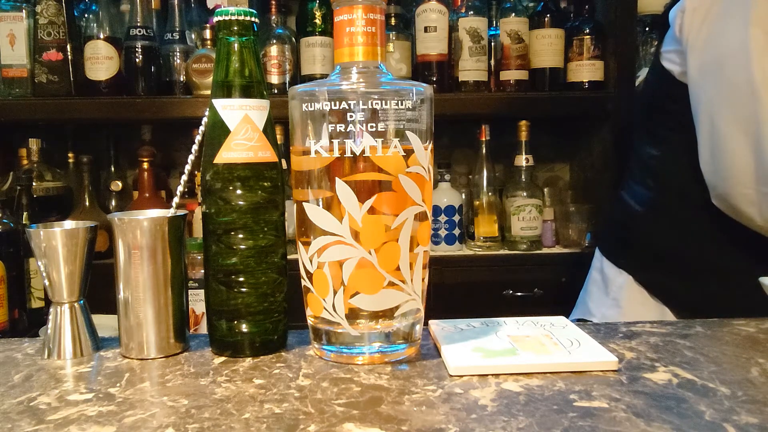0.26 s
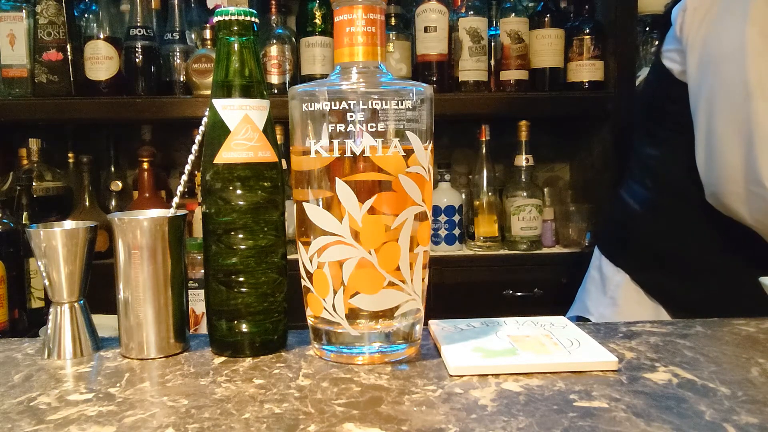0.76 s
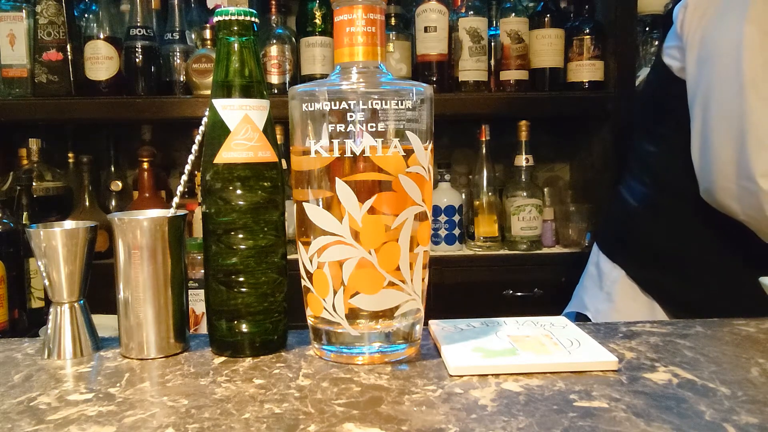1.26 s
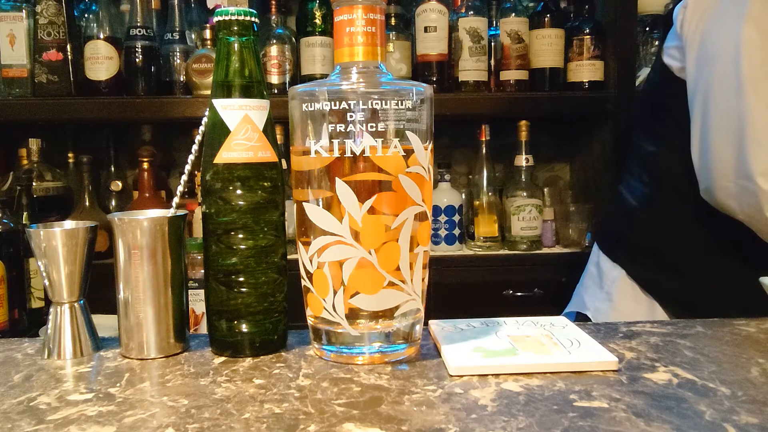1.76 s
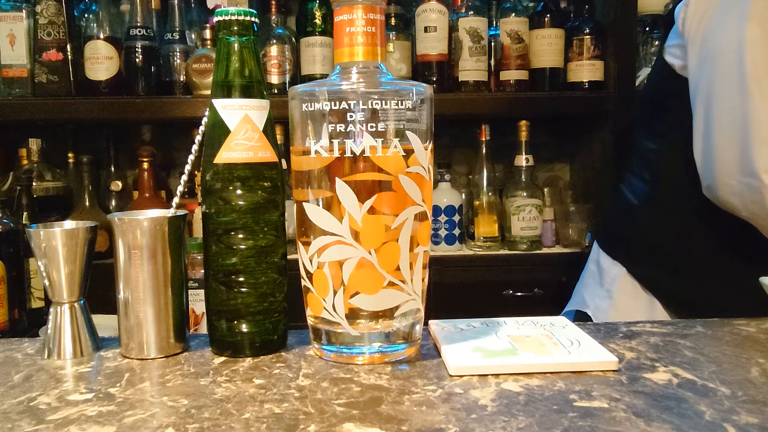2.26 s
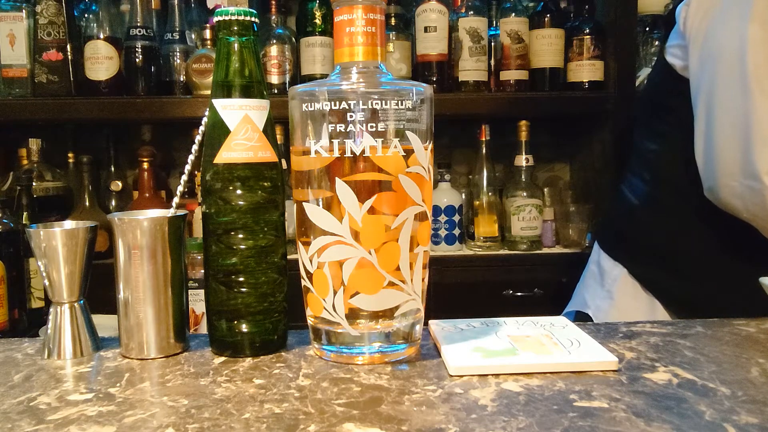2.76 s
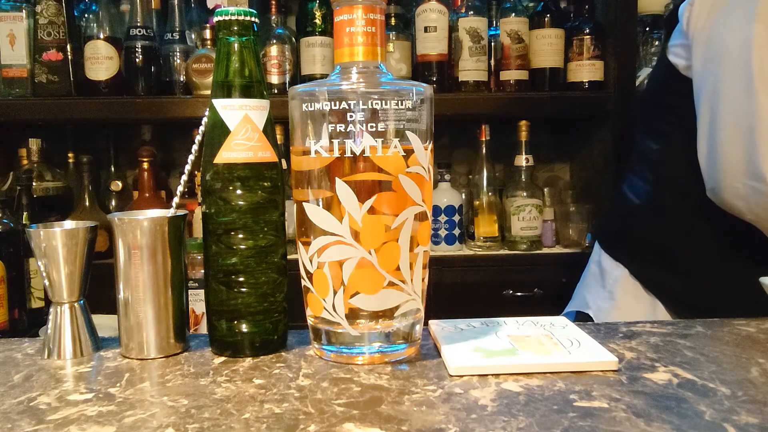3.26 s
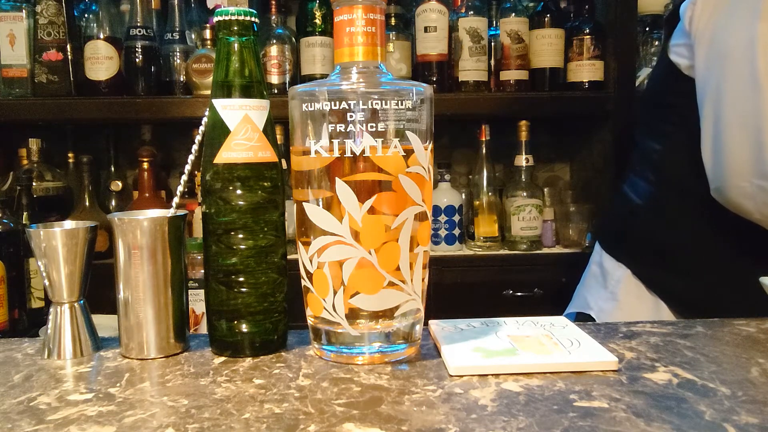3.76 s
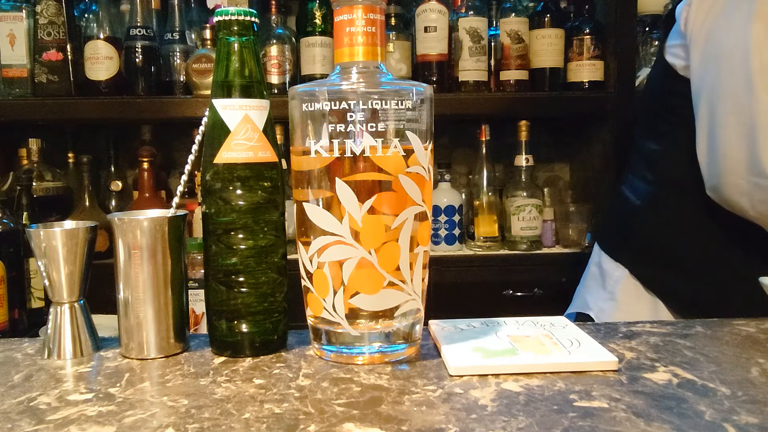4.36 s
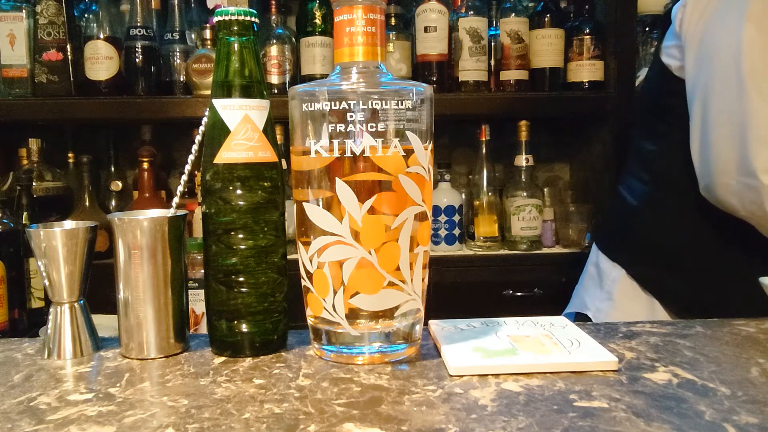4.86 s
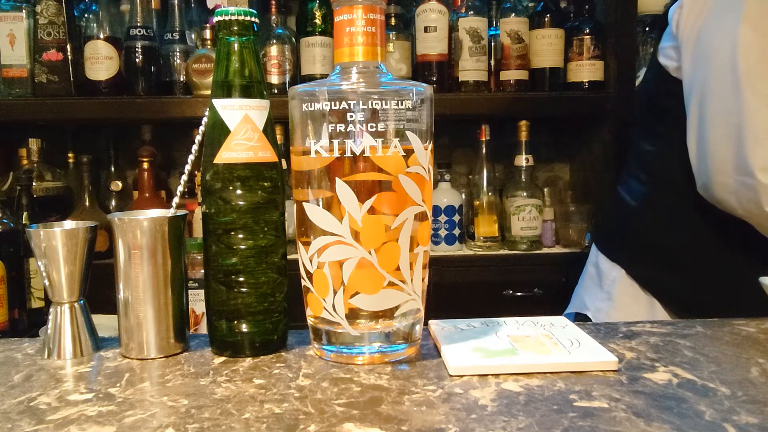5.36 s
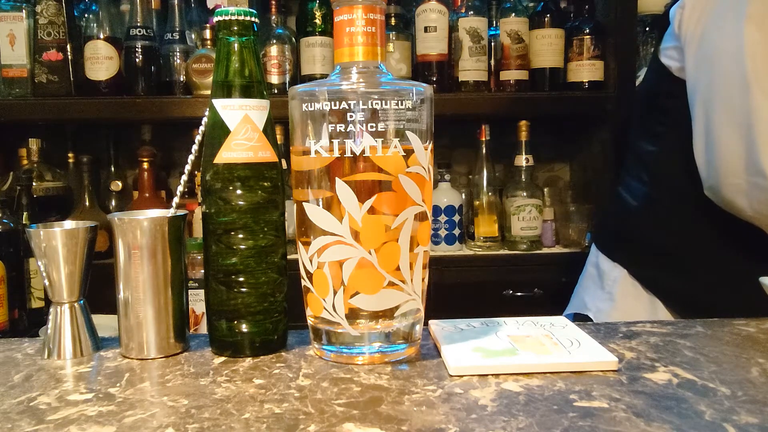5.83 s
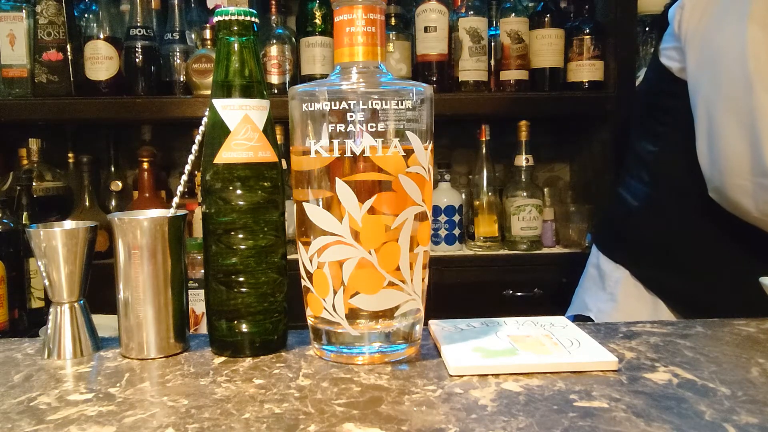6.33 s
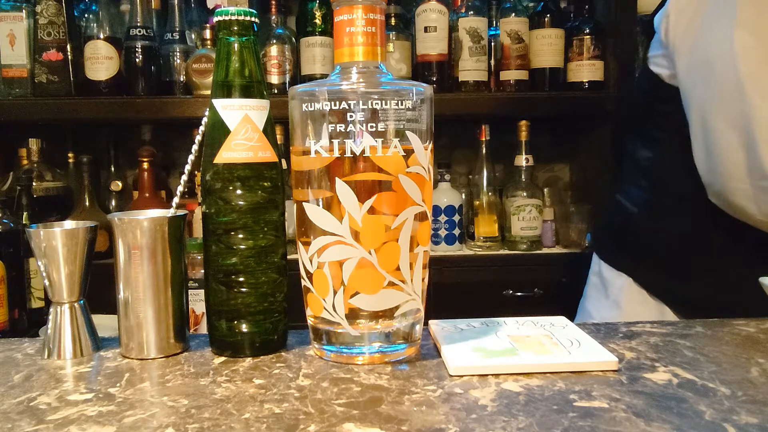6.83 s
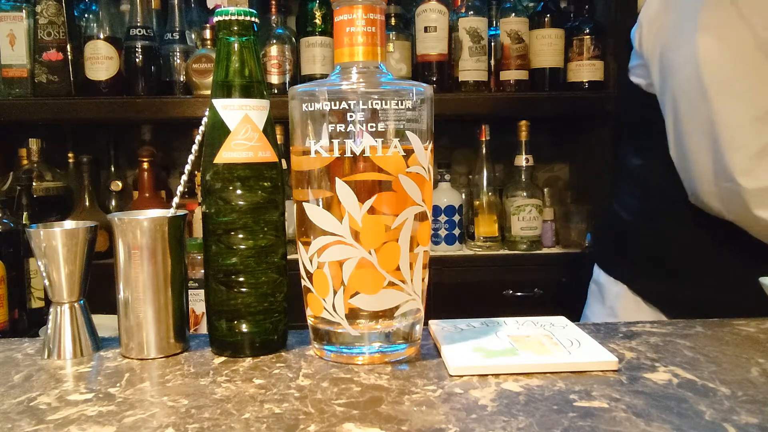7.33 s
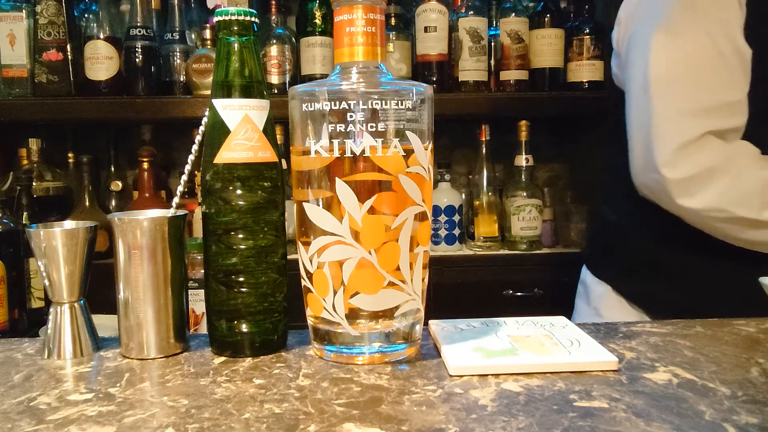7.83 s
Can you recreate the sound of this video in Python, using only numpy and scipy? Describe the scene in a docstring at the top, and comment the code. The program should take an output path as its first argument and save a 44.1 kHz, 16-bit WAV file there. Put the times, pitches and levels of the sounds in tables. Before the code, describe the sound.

Thin metal clinks open the scene, then ice cubes clatter and shift as a scoop pushes through them several times, loudest a little past the middle. The ice settles, the scoop clinks down, and a wooden surface takes some soft knocks. Everything is heard slightly indirectly from across a bar counter, with short small-room echoes and the low, steady hum of a fridge.

```python
"""Behind a quiet bar counter a steel scoop is picked up, digs through a bin of ice and is laid down.
Cubes knock, slide and tumble, ringing the bin; the scoop clinks; the wooden top takes a few dull knocks.
Each blow is a contact plus a dying rattle that drives decaying modes and an unpitched tick.
A small room blurs every blow; a fridge hums throughout."""
import sys
import numpy as np
from scipy import signal
from scipy.fft import rfft, irfft, next_fast_len
from scipy.io import wavfile

SR = 44100
rng = np.random.default_rng(int(sys.argv[2]) if len(sys.argv) > 2 else 0)


def inscribe(sig):
    """Save sig as 16-bit PCM at rate SR to the path in sys.argv[1].

    A 1-D sig is mono; a 2-D sig holds one channel per row.
    Samples are clipped to [-1, 1] before scaling.
    """
    pcm = np.round(np.clip(np.atleast_2d(sig).T, -1, 1) * 32767)
    wavfile.write(sys.argv[1], SR, pcm.astype(np.int16))


N = 356764
RING_SAMPLES, PLACES = 2 ** 14, 4  # places: spots where blows land


def amp(db):
    return 10 ** (np.asarray(db) / 20)


def unit_energy(x):
    return x / np.sqrt(np.sum(x ** 2))


def curve_at(table, hz):
    """Read an (Hz, value) table on a log-frequency axis."""
    table_hz, values = np.transpose(table)
    return np.interp(np.log(np.maximum(hz, 1)), np.log(table_hz), values)


def convolve(x, response):
    return signal.oaconvolve(np.atleast_2d(x), np.atleast_2d(response), axes=1)[:, :N]


def min_phase(table, size=4096):
    """Minimum-phase response of an (Hz, dB) table."""
    cepstrum = irfft(np.log(amp(curve_at(table, np.fft.rfftfreq(size, 1 / SR)))))
    cepstrum[1:size // 2] *= 2
    cepstrum[size // 2 + 1:] = 0
    return irfft(np.exp(rfft(cepstrum)))[:size // 2]


def tick(spectrum):
    """A short unpitched contact of the given colour."""
    return np.pad(unit_energy(min_phase(spectrum)), (0, RING_SAMPLES - 2048))


def ring(modes, scatter_db):
    """Decaying modes; where the blow lands changes their balance."""
    t = np.arange(RING_SAMPLES) / SR
    offsets_db = scatter_db * rng.standard_normal(len(modes))
    out = 0
    for (hz, db, t60_s), offset_db in zip(modes, offsets_db):
        decay = 1000. ** (-t / max(t60_s, .005))
        out += amp(db + offset_db) * np.sin(2 * np.pi * hz * t) * decay
    return unit_energy(out)


def grains(shape, rate_hz, scatter_db):
    """Sparse tiny collisions of either sign with long-tailed sizes."""
    hit = rng.random(shape) < rate_hz / SR
    return hit * rng.choice([-1., 1.], shape) * amp(scatter_db * rng.exponential(size=shape))


def blows(events, rate_hz, scatter_db, contact, size=4096):
    """Force (place, band, sample): a first contact and a dying rattle, at each place in turn."""
    rattle = grains((len(events), size), rate_hz, scatter_db)
    rattle[:, 0] = contact
    t = np.arange(size) / SR
    force = np.zeros((PLACES, 3, N + size))
    for k, (start_s, db, low_db, high_db, decay_s) in enumerate(events):
        burst = unit_energy(rattle[k] * np.exp(-t / decay_s))
        start = int(start_s * SR)
        force[k % PLACES, :, start:start + size] += amp(db + np.array([[0], [low_db], [high_db]])) * burst
    return force[:, :, :N]


def struck(force, modes, contact_tick, scatter_db, edges_hz):
    """One sound per place: mid, low and high bands of a body, each driven by its own force."""
    cuts = (edges_hz, "band"), (edges_hz[0], "low"), (edges_hz[1], "high")
    filters = [signal.butter(3, hz, kind, fs=SR, output="sos") for hz, kind in cuts]
    sounds = []
    for band_forces in force:
        body = ring(modes, scatter_db) + contact_tick
        bands = [unit_energy(signal.sosfilt(sos, body)) for sos in filters]
        sounds.append(convolve(band_forces, bands).sum(axis=0))
    return np.array(sounds)


# Each row: frequency in Hz, left-right correlation.
STEREO_LIKENESS = [(60, .5), (130, .95), (290, .72), (640, .05), (1400, -.1), (3000, 0)]


def stereo_noise(size):
    """Spectra of two noises whose likeness follows frequency."""
    likeness = curve_at(STEREO_LIKENESS, np.fft.rfftfreq(size, 1 / SR))
    mid, side = rfft(rng.standard_normal((2, size))) * np.sqrt([(1 + likeness) / 2, (1 - likeness) / 2])
    return np.array([mid + side, mid - side])


# Air noise. Each row: frequency in Hz, relative density in dB.
AIR_SPECTRUM = [(25, -21), (70, -16), (130, -25), (190, -31), (290, -23), (450, -17.5), (700, -24),
                (1500, -28.5), (3000, -32.5), (16000, -46.5)]
# Motor tones and a thin whine. Each row: frequency in Hz, rms level in dB, width in Hz.
MOTOR_TONES = [(236, -75.5, 8), (363.4, -70, 6.8), (410, -74.5, 30), (448, -74.5, 6), (770, -81, 3),
               (1576, -83.5, 4.5), (2406, -81, 2.4)]


def fridge(air_db=-67.5):
    """Air noise and narrow wavering motor tones."""
    size = 2 * next_fast_len(N // 2 + 1)
    hz = np.fft.rfftfreq(size, 1 / SR)
    air = irfft(stereo_noise(size) * amp(curve_at(AIR_SPECTRUM, hz)))
    out = amp(air_db) * air / air.std()
    for centre_hz, db, width_hz in MOTOR_TONES:
        tone = irfft(stereo_noise(size) / (1 + (2 * (hz - centre_hz) / width_hz) ** 2))
        out += amp(db) * tone / tone.std()
    return out[:, :N]


# Room decay. Each row: frequency in Hz, T60 in seconds.
ROOM_DECAY = [(100, 0.23), (300, 0.55), (1000, 0.36), (3000, 0.39), (8000, 0.34), (16000, 0.35)]
# Path round the counter, weak in treble. Each row: frequency in Hz, relative gain in dB.
DIRECT_PATH = [(120, 8.5), (400, 24.5), (900, 20), (8000, 9)]


def room(rise_s=0.0034, early_db=4, early_s=0.0041, gain_db=-4):
    """The counter hides the source: a weak direct path, echoes that fill in fast and die band by band."""
    size = 2 * RING_SAMPLES
    t, hz = np.arange(size) / SR, np.fft.rfftfreq(size, 1 / SR)
    noise, echoes = stereo_noise(size), 0
    for band_hz, t60_s in ROOM_DECAY:
        band = curve_at([(f, f == band_hz) for f, _ in ROOM_DECAY], hz)
        echoes += irfft(noise * band) * 1000. ** (-t / t60_s)
    response = echoes * (1 - np.exp(-t / rise_s)) * (1 + amp(early_db) * np.exp(-t / early_s))
    response[:, :2048] += min_phase(DIRECT_PATH)
    # the deepest bass of the knocks is cut below about 128 Hz
    return amp(gain_db) * signal.sosfilt(signal.butter(4, 128, "high", fs=SR, output="sos"), response)


# Knocks on the counter. Each row: start in seconds, level in dB, boom and click in dB re level,
# rattle decay in seconds.
COUNTER_THUMPS = [(7.145, -48, 2, 1.5, 0.0049), (7.652, -48, 9, -3, 0.0076), (7.684, -46, 3, -8, 0.0022),
                  (7.216, -65, -5, -10, 0.004), (7.72, -72, 0, -17, 0.0072),
                  (7.874, -37.5, -11, -7.5, 0.0025), (8.016, -39, -8, -11, 0.0051)]
# Wooden top. Each row: frequency in Hz, relative level in dB, T60 in seconds.
COUNTER_MODES = [(252, 1, 0.16), (392, -22, 0.054), (455, 9, 0.078), (575, 3, 0.04), (820, 13.5, 0.0067),
                 (1280, 6, 0.0093)]


def counter():
    """The wooden top answers with short hollow modes and a faint tick, coloured like the ice's."""
    force = blows(COUNTER_THUMPS, rate_hz=1400, scatter_db=2, contact=1.7)
    faint_tick = amp(-12.5) * tick(ICE_SPECTRUM)
    return struck(force, COUNTER_MODES, faint_tick, scatter_db=9, edges_hz=(700, 2000))


# Scoop touching down. Each row: start in seconds, level in dB, low ring and shimmer in dB re level,
# rattle decay in seconds.
SCOOP_CLINKS = [(0.045, -46.5, -6, -1.5, 0.011), (0.0703, -44.5, -1, 1, 0.0025),
                (0.1386, -47, -7, -1, 0.0041), (0.1962, -28, -14.5, -2, 0.0021),
                (0.254, -32, -15.5, 2, 0.012), (0.2865, -47.5, -22, 0.5, 0.006),
                (0.3655, -56.5, 6.5, -24, 0.0081), (2.98, -37, 6.5, -0.5, 0.0042),
                (3.1017, -41.5, 4, -7, 0.0039), (7.0475, -30, -13, -5.5, 0.0035),
                (7.092, -39.5, -12, -5.5, 0.0061)]
# Steel scoop. Each row: frequency in Hz, relative level in dB, T60 in seconds.
SCOOP_MODES = [(632.5, -4, 0.15), (1610, 16, 0.015), (2435, 0.5, 0.025), (2694, 3.5, .028),
               (3830, 5, 0.017), (5730, 3, 0.03), (7630, -9.5, 0.018), (9460, -8, 0.039),
               (9600, -5.5, 0.04), (10610, -1, .025), (11700, -4.5, .025), (13200, -1, .02)]


def scoop():
    """Thin steel rings over a bright tick."""
    force = blows(SCOOP_CLINKS, rate_hz=1800, scatter_db=4, contact=4.6)
    bright_tick = tick([(900, -7), (1600, 11.5), (6000, 4), (16000, -13)])
    return struck(force, SCOOP_MODES, bright_tick, scatter_db=5.5, edges_hz=(2000, 5000))


# Heap sliding under the scoop. Each row: start and settling onset in seconds, relative level at that
# onset in dB, swell up to it in dB, crack in dB re level.
HEAP_SLIDES = [(1.02, 1.208, -41, 8, -9.5), (1.487, 1.52, -37.5, 6, -6), (1.606, 1.667, -40.5, 9, -3.5),
               (1.907, 1.98, -33.5, 8.5, -8), (2.607, 2.642, -34, 2.5, -7), (2.65, 2.755, -28.5, 10.5, -10),
               (2.853, 2.929, -26.5, 25.5, -11), (3.385, 3.52, -37.5, 4, -10.5),
               (4.033, 4.33, -52, -3, -20), (4.42, 4.585, -47.5, 13, -3), (4.582, 4.627, -39.5, 1.5, -0.5),
               (4.655, 4.78, -43.5, 2.5, -9), (4.787, 4.863, -32.5, -3, -4), (4.87, 4.97, -36, 8, -3.5),
               (4.974, 5.055, -20, 4.5, -7), (5.634, 5.95, -72, -11.5, -1), (6.03, 6.04, -39, 7, -5.5)]


def sliding_heap(gain_db=-29, thud_db=-8.5, fade_in_s=.02, settle_db_per_s=171.5):
    """Force of tumbling cubes: collisions at every place set in, swell or ebb, then settle."""
    t = np.arange(N) / SR
    collisions = unit_energy(grains((PLACES, 1, N), rate_hz=500, scatter_db=2.5)) * np.sqrt(N)
    band_gains = np.zeros((3, N))
    for start_s, settle_s, db, swell_db, crack_db in HEAP_SLIDES:
        swelling_db = swell_db * (settle_s - t) / (settle_s - start_s)
        drop_db = np.where(t < settle_s, swelling_db, settle_db_per_s * (t - settle_s))
        envelope = np.clip((t - start_s) / fade_in_s, 0, 1) * amp(-np.clip(drop_db, -20, 100))
        band_gains += amp(gain_db + db + np.array([[0], [thud_db], [crack_db]])) * envelope
    return band_gains * collisions


# Cubes knocking. Each row: start in seconds, level in dB, thud and crack in dB re level.
CUBE_KNOCKS = [(0.901, -40, -7.5, -1.5), (1.02, -46, -1, -8), (1.072, -32.5, -7, -12),
               (1.143, -36.5, -2.5, -9.5), (1.176, -35, 3.5, -13.5), (1.417, -38.5, -8, -1),
               (1.521, -34, -12, -8), (1.57, -29.5, -12, -10.5), (1.654, -23.5, -13.5, -14.5),
               (1.7, -29, -4.5, -2), (1.889, -50.5, 2, -0.5), (2.011, -28, -7.5, -11.5),
               (2.036, -25, -15, -8), (2.276, -61.5, 2, -3), (2.365, -45.5, -4.5, -3.5),
               (2.396, -30, -4.5, -8.5), (2.556, -35.5, -12, -10.5), (2.754, -27.5, -13.5, 0.5),
               (2.83, -28, -18, -10), (2.881, -23.5, -4, -8.5), (2.905, -17.5, -27.5, -11),
               (2.94, -23, -7, -1.5), (2.988, -25, -15, -12), (3.103, -35, -0.5, -13),
               (3.352, -32, -9, -4.5), (3.388, -50.5, 8, -23), (3.443, -30, -12, -4),
               (3.458, -23, -7, -5.5), (3.65, -46.5, -1.5, -30), (4.001, -27.5, -2.5, -8.5),
               (4.039, -29, -1, -6.5), (4.186, -42, 7, -10.5), (4.401, -49, 0, -0.5), (4.537, -44, 3, -22),
               (4.894, -32.5, -7, -3), (5.053, -13, -16.5, -3.5), (5.094, -17, -20.5, -3),
               (5.451, -48, 1, -8.5), (5.56, -32, -6.5, -14.5), (5.588, -48, 4.5, -2.5),
               (6.011, -45.5, -5, -8), (6.066, -24.5, -25, -5), (6.104, -29.5, -9.5, -9.5),
               (6.242, -44.5, -11, -10.5), (7.61, -53, -10.5, 10.5), (7.677, -45, 5, -2.5),
               (8.055, -35.5, -6, -1.5)]
# Tick of ice. Each row: frequency in Hz, relative density in dB.
ICE_SPECTRUM = [(100, -33), (146, -17.5), (300, -3.5), (430, 0.5), (750, -7.5), (1150, -6), (2200, -11.5),
                (4000, -11.5), (7000, -16.5), (16000, -27)]
# Bin and cabinet. Each row: frequency in Hz, relative level in dB, T60 in seconds (floored at 5 ms).
BIN_MODES = [(150.2, 6, 0.098), (212.9, 6.5, 0.089), (443.4, 3, 0.079), (502, -3.5, 0.069),
             (619, -16.5, 0.26), (1110, -0.5, 0.0033), (2405, -15, 0.014)]


def ice(rattle_s=0.011):
    """Cubes tick against each other and ring the bin."""
    knocks = [(*row, rattle_s) for row in CUBE_KNOCKS]
    force = blows(knocks, rate_hz=2500, scatter_db=4, contact=3.26) + sliding_heap()
    return struck(force, BIN_MODES, tick(ICE_SPECTRUM), scatter_db=3.5, edges_hz=(600, 2800))


def scene():
    """Each place is heard through its own set of echoes, over the fridge."""
    return sum(convolve(place, room()) for place in ice() + scoop() + counter()) + fridge()


# Port resonance. Each row: frequency in Hz, gain in dB.
PORT_RESONANCE = [(4000, 0), (6000, 0), (6900, -4), (7600, 5.5), (9500, 1.5)]
# Left port. Each row: frequency in Hz, gain in dB re right.
LEFT_PORT_LOSS = [(1500, .3), (4000, -1.5), (8000, -4.5), (11000, -10), (16000, -11)]


def record(dry, hiss_db=-90, top_hz=15900):
    """The microphone ports colour the treble, the left one duller; faint circuit hiss; the top is cut."""
    left = convolve(dry[0], min_phase(LEFT_PORT_LOSS))
    wet = convolve(np.vstack([left, dry[1]]), min_phase(PORT_RESONANCE))
    wet += amp(hiss_db) * rng.standard_normal(wet.shape)
    return signal.sosfilt(signal.ellip(10, .2, 70, top_hz, fs=SR, output="sos"), wet)


dry = scene()
out = record(dry)
inscribe(out)
```